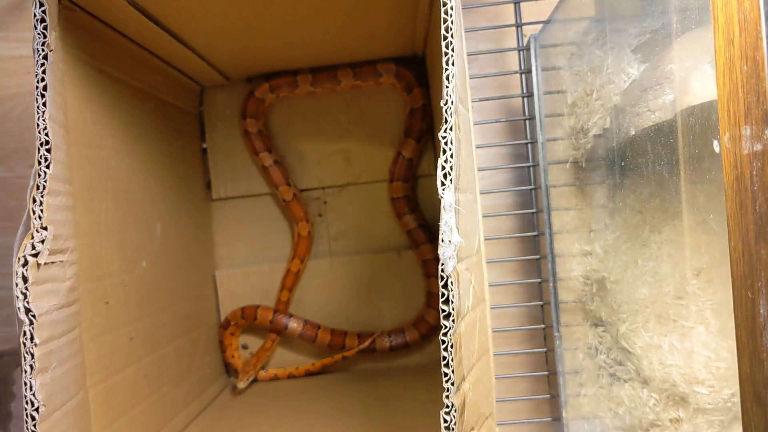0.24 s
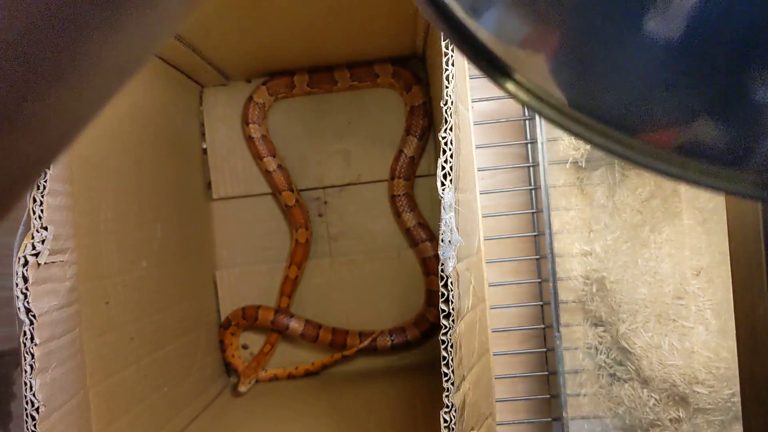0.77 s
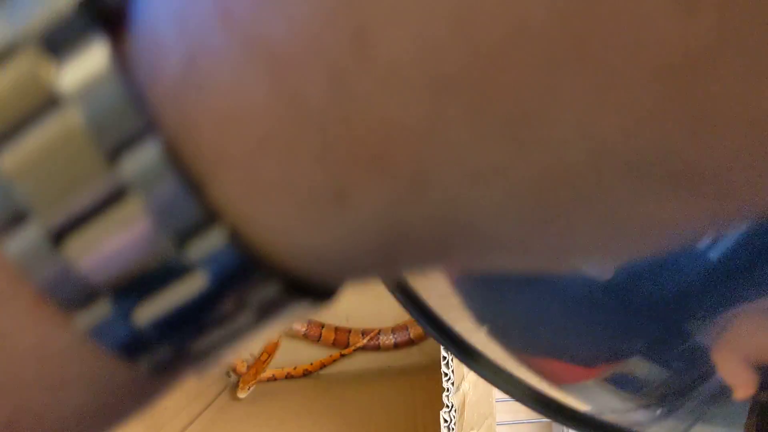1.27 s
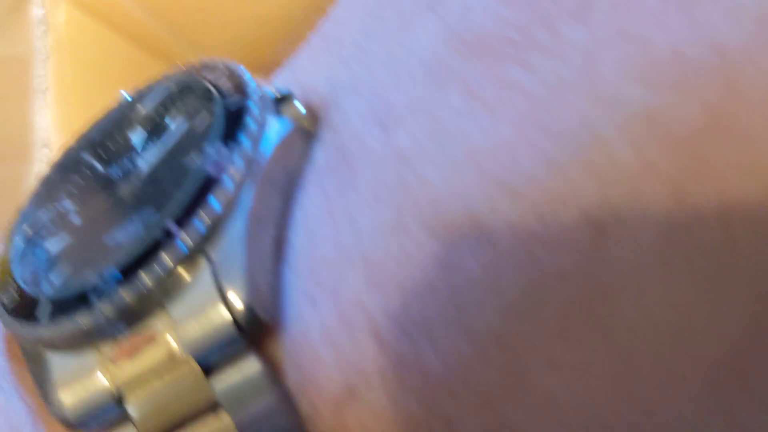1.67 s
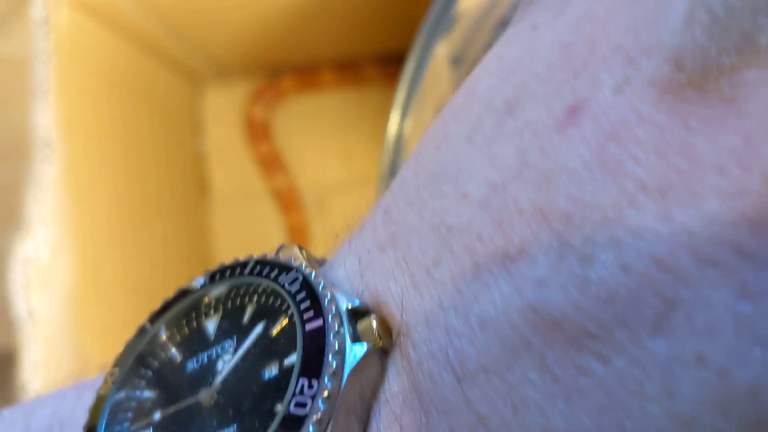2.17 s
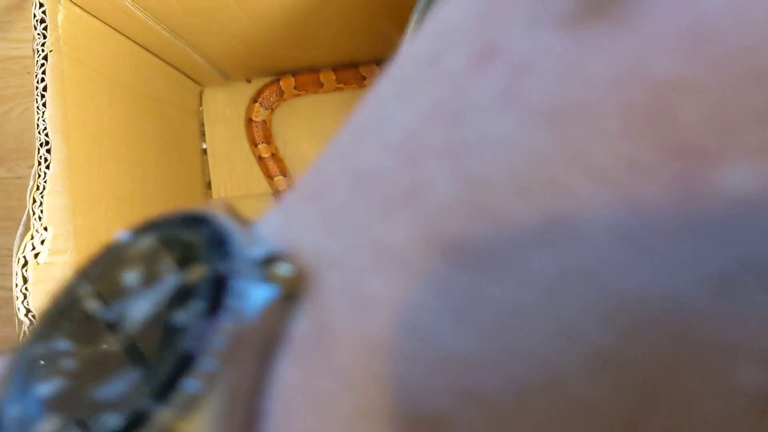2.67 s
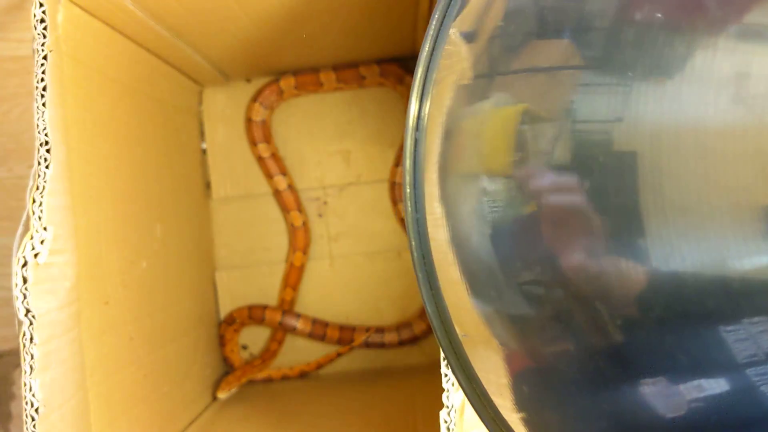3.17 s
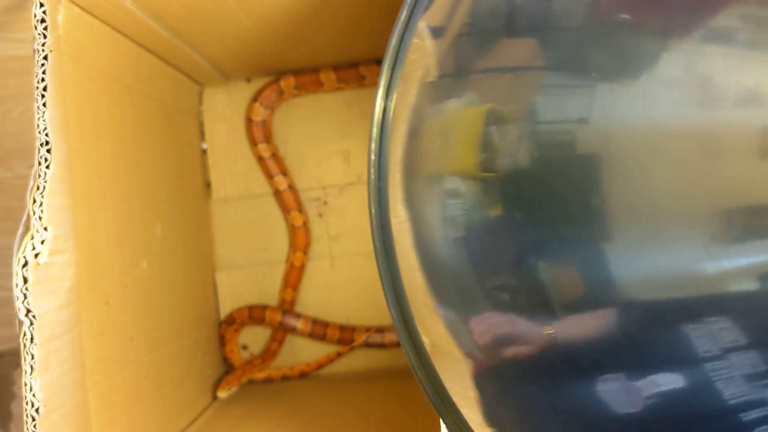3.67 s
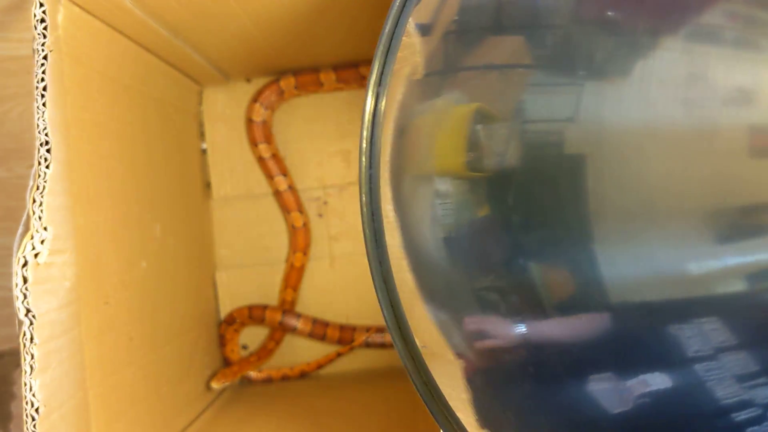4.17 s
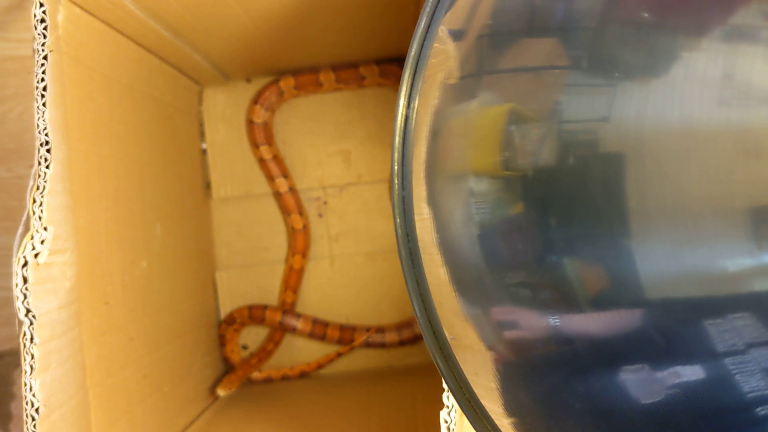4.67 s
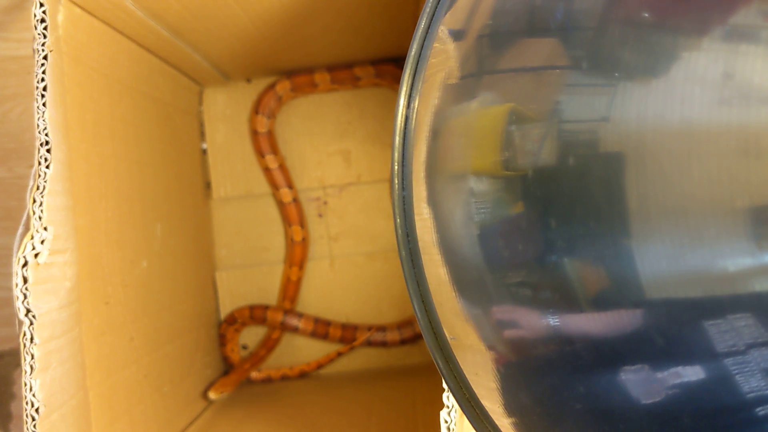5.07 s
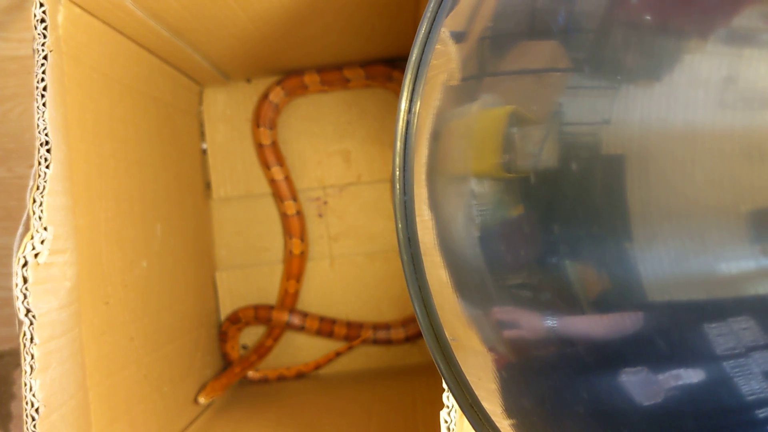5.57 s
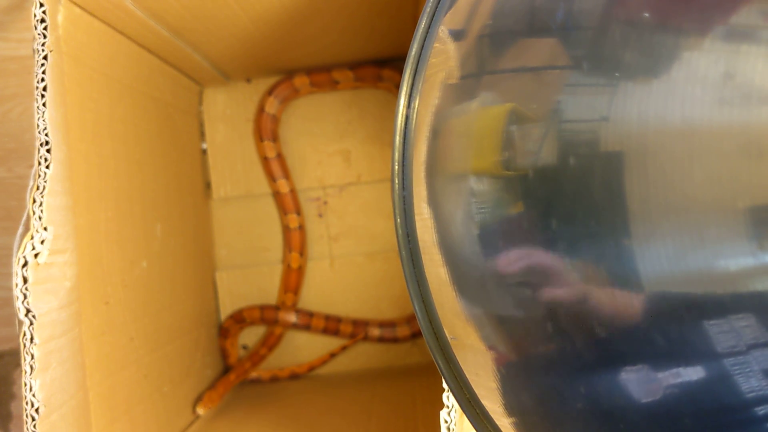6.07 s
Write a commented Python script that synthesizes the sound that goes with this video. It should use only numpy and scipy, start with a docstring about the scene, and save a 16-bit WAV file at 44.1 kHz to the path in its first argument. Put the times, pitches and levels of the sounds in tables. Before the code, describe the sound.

A big thin metal bowl scrapes and knocks in spurts across a cardboard box, with faint high bird twitters in the room.

```python
"""A big thin metal bowl is slid in spurts over a cardboard box in a room. From the start each push
makes it scrape: friction excites the modes of the metal, and the box booms under it. Just after 1 s
the box wall judders by stick and slip; near 1.45 s and 2 s the bowl knocks down hard and rings.
Softer pushes follow, and near 5.8 s it is nudged into place. A small creature, probably a bird,
twitters in four very high phrases: three in the first 3 s and one at the end."""
import sys
import numpy as np
from scipy import signal
from scipy.fft import rfft, irfft, next_fast_len
from scipy.io import wavfile
from scipy.ndimage import uniform_filter1d

SR = 44100
rng = np.random.default_rng(int(sys.argv[2]) if len(sys.argv) > 2 else 0)


def digitize_waveform(pressure):
    """Quantize a signal to 16-bit integers and store it at the path in sys.argv[1].

    Rows of a 2-D input are taken as channels; values are limited to [-1, 1].
    """
    field = np.atleast_2d(pressure).T
    bounded = np.clip(field, -1, 1)
    quanta = np.round(bounded * 32767).astype(np.int16)
    wavfile.write(sys.argv[1], SR, quanta)


N = 279153
TIME = np.arange(N) / SR

# likeness of the two channels, clipped in use: (frequency [Hz], correlation [1])
CORRELATION = [(60, 1.23), (160, 0.85), (550, 0.9463), (1100, -0.1964), (2200, -0.654), (7000, 0)]
# stereo balance: (frequency [Hz], left over right [dB])
BALANCE = [(60, 8), (160, 3), (300, 3.5), (550, 3.5), (1100, 1), (4000, 0), (8000, 6), (15000, -0.5)]
# room tone: (frequency [Hz], relative density [dB])
ROOM_SPECTRUM = [(20, -41.5), (45, -12.5), (80, -2), (190, -7.5), (310, -23.5), (470, -9.5), (950, -22.5),
                 (1450, -19), (2300, -21.5), (4400, -23), (9000, -32.5), (16000, -35)]
# notes of the twitter: (time [s], length [s], level [dB], syllable [name])
NOTES = [(0.06, 0.02155, -40.5, "low"), (.558, 0.036, -42, "middle"), (.574, 0.0656, -45, "top"),
         (0.578, 0.038, -42.5, "flick"), (0.581, 0.0396, -54, "squeak"), (0.59, 0.0267, -39.5, "shrill"),
         (0.591, 0.0185, -38.5, "chip"), (.644, 0.0325, -39.5, "dip"), (0.657, 0.027, -43, "top"),
         (.705, 0.047, -47, "middle"), (0.729, 0.0286, -39.5, "rasp"), (0.753, 0.0445, -41.5, "buzz"),
         (0.76, .03, -43, "lift"), (0.797, 0.0467, -36, "dip"), (.905, 0.0302, -49.5, "low"),
         (0.938, 0.0184, -42, "dip"), (1.469, 0.034, -37.5, "shrill"), (1.496, 0.1032, -42.5, "middle"),
         (1.507, 0.0537, -39.5, "top"), (1.555, 0.0179, -36.5, "dip"), (1.616, 0.027, -42.5, "top"),
         (1.656, 0.0272, -30.5, "lift"), (1.659, 0.0704, -37.5, "fall"), (1.672, 0.144, -44.5, "buzz"),
         (1.8, 0.036, -35.5, "top"), (2.244, 0.0378, -34.5, "top"), (2.252, 0.0278, -33.5, "middle"),
         (2.35, 0.0264, -40, "top"), (2.428, 0.0301, -28.5, "high"), (2.462, 0.05, -49.5, "flick"),
         (2.52, 0.058, -46, "rasp"), (2.586, 0.0334, -36.5, "dip"), (2.688, 0.0526, -46.5, "low"),
         (5.794, 0.0663, -42, "middle"), (5.806, 0.0276, -50, "top"), (5.843, 0.0704, -36.5, "top"),
         (5.924, 0.0294, -32.5, "high"), (5.985, 0.0251, -31.5, "lift"), (5.999, 0.0339, -42.5, "buzz"),
         (6.01, .05, -64.5, "squeak"), (6.015, 0.0514, -44.5, "fall"), (6.064, 0.0315, -38, "dip"),
         (6.13, 0.0156, -45, "flick"), (6.141, 0.0296, -44.5, "low"), (6.151, 0.031, -49, "buzz"),
         (6.162, 0.0217, -36.5, "dip"), (6.171, 0.0246, -43.5, "top")]
# syllables by name: (start pitch [Hz], end pitch [Hz], roughness [1], relative octave level [dB])
SYLLABLES = {"low": (5896.5, 6149, 0.3545, -8.5), "middle": (7850, 7869, 0.32, -5),
             "high": (9460, 9509.5, 0.07, -34), "top": (10380.5, 10489, 0.2121, -35),
             "dip": (9329, 9033.5, 0.5376, -34), "lift": (8450, 8898.5, 0.14, -38.5),
             "flick": (8902, 7599, 1.25, -15.5), "fall": (6849.5, 5898, 0.6166, -6.5),
             "rasp": (6300, 6901, 0.65, -9), "buzz": (7749, 7498, 0.9435, -8),
             "shrill": (7260, 7330, 0.087, 3), "squeak": (2398.5, 2220.5, 0.17, -23.5),
             "chip": (4927, 5104, 0.25, -30)}
# rasp in the twitter: (frequency [Hz], relative density [dB])
RASP_SPECTRUM = [(1500, -36), (2300, -1), (3200, -12), (5000, -9.5), (7800, -0.5), (10500, -7.5),
                 (12500, -7.5), (15500, 0)]
# rumble of the handled box: (time [s], level [dB])
BOX_RUMBLE = [(0.0, -50.5), (0.14, -50.5), (1.04, -50.5), (1.23, -45), (2.64, -51), (3.03, -46),
              (3.35, -58.5), (3.79, -57), (3.98, -60.5), (4.6, -49.5), (5.11, -64.5), (5.69, -67.5),
              (5.89, -52), (6.33, -59.5)]
# soft swells of noise: light rubs, the rim singing as it drags (2.738 s), a faint high hiss (4.9 s):
# (peak time [s], half length [s], centre [Hz], width [Hz], level [dB])
NOISE_SWELLS = [(0.223, 0.35, 3320, 1200, -62.5), (1.108, 0.033, 11000, 5000, -43),
                (1.364, 0.0101, 2400, 3000, -33.5), (2.738, 0.177, 1347, 160, -50.5),
                (3.586, 0.025, 3706, 250, -53.5), (3.791, 0.1576, 324.9, 24.6, -47.5),
                (3.824, 0.061, 540.2, 120, -40.5), (4.292, 0.075, 627, 117.6, -49.5),
                (4.422, 0.2, 1735, 700, -60.5), (4.593, 0.02, 623, 200, -48), (4.9, 0.0855, 4800, 900, -71),
                (5.746, 0.0336, 3170, 499, -52.5), (5.747, 0.0356, 9400, 11060, -51.5)]
# judders of the box wall: (time at full level [s], rise [s], hold [s], level [dB], pitch [Hz],
# release [dB/s])
JUDDERS = [(1.113, 0.0326, .035, -21.5, 155, 236), (1.361, 0.0158, .008, -28, 169.7, 479)]
# the rim catching: (time [s], level [dB])
TICKS = [(.43, -58), (1.076, -38), (1.221, -53.5), (1.343, -23.5), (2.0057, -23.5), (2.449, -47.5),
         (2.839, -52.5), (4.735, -53.5), (5.575, -61)]
# colour of a tick: (frequency [Hz], relative density [dB])
TICK_SPECTRUM = [(1000, -37.5), (3500, -14.5), (7200, 2.5), (11000, -10), (15000, -7.5)]
# modes of the bowl on the box: (frequency [Hz], relative level [dB], t60 [s])
BOWL_MODES = [(153.08, -12.5, 0.43), (188.9, -9.5, 0.19), (525.95, -5.5, 0.2), (537.3, -3, 0.2),
              (577.43, 0, 0.16), (731.7, -9.5, 0.24), (802.5, -11.5, 0.2), (849.8, -10, 0.31),
              (892.5, -24, 0.13), (1020.8, -5.5, 0.1926), (1211, -15.5, .2), (1234.4, -7, 0.26),
              (1291, -8, 0.15), (1387, -6.5, 0.18), (1699.6, -7, 0.07), (1890, -18.5, 0.047),
              (2144, -17, .08), (6070, -25, 0.078), (6650, -11.5, 0.17), (7050, -13.5, 0.062),
              (7360, -12, .05), (7500, -17.5, 0.075), (8730, -16, 0.22)]
# boom, body, clack and treble registers: (low edge [Hz], high edge [Hz])
REGISTERS = [(35, 320), (320, 850), (850, 3500), (3500, 17000)]
# shifting place of the bowl: (time [s], extra left over right [dB])
BOWL_PLACE = [(0, -1), (.9, -0.5), (1.45, 0), (1.9, 2.5), (2.01, -1), (2.5, 0), (3.7, .5), (4.5, -1.5),
              (6.3, -1.5)]
# pushes: (time at full speed [s], rise [s], hold [s], level [dB], brightness [dB])
PUSHES = [(0.005, 0.0103, 0.0054, -32.5, -6), (0.179, 0.16, 0.15, -59, 1.5),
          (0.324, 0.057, 0.0696, -47.5, -5), (0.589, 0.18, 0.346, -57.5, -1),
          (0.969, 0.0127, 0.0355, -46, -3), (1.077, 0.047, 0.0454, -33, -11.5),
          (1.348, 0.0231, 0.0072, -36, -3.5), (1.452, 0.0093, 0.0135, -28, -4.5),
          (1.487, 0.032, 0.422, -41.5, -1.5), (1.893, 0.225, 0.183, -39.5, -8),
          (2.179, 0.148, 0.1873, -42.5, -5), (2.541, 0.154, 0.3, -47.5, -3),
          (3.038, 0.0446, 0.0302, -38.5, -7.5), (3.156, 0.15, 0.103, -53, -9.5),
          (3.56, 0.1996, 0.137, -47.5, -5.5), (3.788, 0.0724, 0.05, -38, -10.5),
          (4.188, 0.258, 0.39, -59.5, -5), (4.275, 0.153, 0.023, -44.5, -13.5),
          (4.343, 0.047, 0.0165, -43.5, -3.5), (4.635, 0.034, 0.0056, -40.5, -9),
          (4.729, .1, 0.05, -55, -24), (4.867, .1, 0.18, -77.5, -4.5), (5.83, 0.026, 0.0228, -38.5, -18),
          (5.933, .1, .04, -52.5, -15.5)]
# sliding metal: (frequency [Hz], relative density [dB])
SLIDING_SPECTRUM = [(35, -33), (70, -9), (180, 3), (360, -8.5), (570, 2), (950, -9.5), (1380, -7.5),
                    (2300, -7), (2900, -17.5), (5200, -20.5), (7200, -25), (9700, -18.5), (11000, -28),
                    (16000, -31)]
# freedom to ring, greatest when the rim rides on the box edge: (time [s], ring over friction [dB])
RING_FREEDOM = [(0, -8.5), (1.4, -17), (1.5, 1), (2.8, -2.5), (2.95, -3), (6.3, -7)]
# the rim singing as it drags on the box edge: (centre [Hz], width [Hz], relative level [dB])
RIM_BANDS = [(1319.5, 280, -8.5), (2238, 180, -22.5), (7396, 1800, -8)]
# noise of a knock: (frequency [Hz], relative density [dB])
KNOCK_SPECTRUM = [(35, -38), (70, -13), (120, 4.5), (190, 4), (340, -5.5), (560, 6), (900, -7),
                  (1370, -1.5), (2200, -13), (4300, -24.5), (7400, -10.5), (9500, -20), (12000, -29),
                  (16000, -33.5)]
# knocks: (time [s], contact time [s], box wall pitch [Hz], pitch favoured by the spot struck [Hz],
# body level over the first 30 ms [dB], boom over body [dB], clack over body [dB])
KNOCKS = [(0.008, 0.00377, 240.8, 517, -43.5, 6.5, 2.5), (0.348, 0.00105, 204.2, 728, -38.5, -18.5, -4.5),
          (0.379, 0.00077, 190.5, 764, -45.5, -2, -4), (0.49, 0.0045, 179.2, 520, -57, 9.5, -11),
          (0.566, 0.0077, 181.1, 492, -54.5, 10.5, -26.5), (0.739, 0.0031, 247.2, 490, -47.5, 2.5, -14.5),
          (0.971, 0.0042, 201.7, 716, -44.5, -2.5, -6), (1.058, 0.0081, 231.7, 602, -36.5, 0.5, -19.5),
          (1.323, 0.00087, 172, 1700, -57, 7, 11), (1.344, 0.00098, 166.2, 730, -43, 11.5, 2),
          (1.449, 0.00039, 178, 548, -16, -15, -7), (1.92, 0.00175, 126.5, 525, -36, -1, -11.5),
          (1.997, 0.0053, 165.1, 764, -25, -11.5, -2.5), (2.0057, 0.000142, 240.3, 1010, -23, -16, 1.5),
          (2.8355, 0.00146, 228.9, 1340, -32.5, -3.5, -2.5), (3.008, 0.0049, 245.5, 503, -37.5, -5, -11.5),
          (3.245, 0.0056, 147.9, 523, -61, 9, -16.5), (3.743, 0.00257, 190.8, 563, -46.5, -6, -9.5),
          (4.634, 0.0102, 213.2, 530, -46.5, 3.5, -5.5), (5.055, 0.0045, 149, 524, -70.5, 7, -3),
          (5.325, 0.00176, 246.3, 1310, -62, 11, -0.5), (5.505, 0.0036, 244, 557, -67.5, 3.5, -3.5),
          (5.676, 0.00141, 245.7, 1380, -53.5, 11, 3), (5.684, .0008, 236.2, 547, -53, 8.5, -9.5),
          (5.817, 0.00148, 220.6, 782, -40, 0, -7.5), (5.835, 0.00145, 214.6, 504, -47, -1, 1)]

SIDES = np.array([[.5], [-.5]])   # splits a level difference between left and right


def from_db(db):
    """Amplitude ratio of a level in decibels."""
    return 10 ** (np.asarray(db) / 20)


def rms_one(x):
    """Normalisation to unit power."""
    return x / np.sqrt(np.mean(x ** 2) + 1e-20)


def in_time(points):
    """Linear interpolation of a curve at every sample."""
    return np.interp(TIME, *np.transpose(points))


def at_hz(points, hz):
    """Interpolation of a spectrum on a log-frequency axis."""
    f, value = np.transpose(points)
    return np.interp(np.log(hz + 1), np.log(f), value)


def band(x, low, high, order=3):
    """Causal Butterworth band-pass."""
    sos = signal.butter(order, [low, min(high, .47 * SR)], "band", fs=SR, output="sos")
    return signal.sosfilt(sos, x + 1e-18)


def wander(per_s, size):
    """Continuous random modulation of unit variance."""
    steps = np.arange(size) * per_s / SR
    return np.interp(steps, np.arange(size), rng.standard_normal(size)) * np.sqrt(3 / 2)


def swell_db(s, rise_s, hold_s, release_db_per_s, rise_db=17):
    """Exponential growth, hold and exponential decay, in dB relative to the top."""
    rise = np.minimum(rise_db * (TIME - s) / rise_s, 0)
    release = release_db_per_s * np.maximum(TIME - s - hold_s, 0)
    return np.maximum(rise - release, -150)


def stereo_noise(size, spectrum, grain=1):
    """Partial coherence: coloured noise, alike at both sides in the bass and unrelated in the treble."""
    hz = np.fft.rfftfreq(size, 1 / SR)
    mid, side = rfft(rng.standard_normal((2, size)) * grain)
    alike = np.clip(at_hz(CORRELATION, hz), 0, .99)
    pair = np.sqrt(1 + alike) * mid + 2 * SIDES * np.sqrt(1 - alike) * side
    colour = from_db(at_hz(spectrum, hz) + SIDES * at_hz(BALANCE, hz))
    return rms_one(irfft(pair * colour, size))


def steady_noise(spectrum):
    """Stationary stereo noise as long as the scene."""
    return stereo_noise(next_fast_len(N), spectrum)[:, :N]


def room_tone(level_db=-61):
    """Ambient noise floor, strongest in the bass."""
    return from_db(level_db) * steady_noise(ROOM_SPECTRUM)


def across_room(x, direct_db=-6, wet_db=-2.5, direct_lean_db=10, wet_lean_db=6, t60=0.21):
    """Direct and reverberant fields: one path from the left, then dense decaying reflections."""
    t = np.arange(SR // 2) / SR
    echoes = rng.standard_normal((2, len(t))) * from_db(-60 * t / t60)
    echoes /= np.sqrt(np.sum(echoes ** 2) / 2)
    wet = signal.fftconvolve(x[None], echoes, axes=1)[:, :N]
    return from_db(direct_db + SIDES * direct_lean_db) * x + from_db(wet_db + SIDES * wet_lean_db) * wet


def twitter(stumble_hz=350, rough_hz=520, flicker_db=3, edge_s=0.0072, difference_db=-8.5, rasp_db=-7):
    """Random modulation roughens short whistles; two at once mix into a lower difference tone."""
    voice, octave, power, rasp_power = np.zeros((4, N))
    for s, length, level_db, syllable in NOTES:
        start_hz, end_hz, rough, octave_db = SYLLABLES[syllable]
        size, at = int(length * SR), int(s * SR)
        t, span = np.arange(size) / SR, slice(at, at + size)
        jitter = min(rough, 1) * rough_hz * 2 * np.tanh(wander(2000, size) / 2)
        stumble = rough * stumble_hz * wander(140, size)
        hz = np.linspace(start_hz, end_hz, size) + jitter + stumble
        phase = 2 * np.pi * np.cumsum(hz) / SR
        swell = np.sin(np.pi / 2 * np.clip(np.minimum(t, length - t) / edge_s, 0, 1)) ** 2
        swell *= from_db(level_db + flicker_db * rough * wander(500, size))
        voice[span] += swell * np.sin(phase)
        octave[span] += swell * from_db(octave_db) * np.sin(2 * phase)
        power[span] += swell ** 2
        rasp_power[span] += (swell * rough) ** 2
    difference = from_db(difference_db) * band(voice ** 2 / np.sqrt(power + 1e-12), 2000, 3700)
    rasp = from_db(rasp_db) * np.sqrt(rasp_power) * steady_noise(RASP_SPECTRUM)[0]
    return np.sqrt(2) * (voice + octave + difference) + rasp


def noise_swells():
    """Band-limited noise under Gaussian envelopes: light rubs, the singing rim and a faint high hiss."""
    out, white = 0, steady_noise([(20, 0), (20000, 0)])
    for s, half_s, hz, width_hz, level_db in NOISE_SWELLS:
        noise = rms_one(band(white, max(hz - width_hz / 2, 20), hz + width_hz / 2, order=2))
        out += noise * from_db(level_db) * np.exp(-((TIME - s) / half_s) ** 2)
    return out


def box_judder(overtone_db=-22, lean_db=5.0, waver=0.02):
    """Stick-slip oscillation locks on to the lowest mode of the box wall."""
    out = 0
    for s, rise_s, hold_s, level_db, hz, release_db_per_s in JUDDERS:
        phase = 2 * np.pi * np.cumsum(hz * (1 + waver * wander(66, N))) / SR
        overtones = (np.sin(3 * phase) + np.sin(4 * phase)) * wander(80, N) / 2
        wave = np.sin(phase) + from_db(overtone_db) * overtones
        out += wave * from_db(level_db + swell_db(s, rise_s, hold_s, release_db_per_s))
    return np.sqrt(2) * out * from_db(SIDES * lean_db)


def rim_ticks(t60=0.0512):
    """Contact transients: the rim catches in bright bursts that decay at once."""
    envelope = 0
    for s, level_db in TICKS:
        envelope += (TIME >= s) * from_db(level_db - 60 * np.clip((TIME - s) / t60, 0, 2))
    return envelope * steady_noise(TICK_SPECTRUM)


def bowl_ring(t, scatter_db=0, spot_hz=1000, spot_db=0):
    """Modal superposition: damped sinusoids, boosted near the pitch that the spot struck favours."""
    hz, level_db, t60 = np.transpose(BOWL_MODES)[:, :, None]
    favour_db = spot_db / (1 + (6 * np.log2(hz / spot_hz)) ** 2)
    strength = from_db(level_db + favour_db + scatter_db * rng.standard_normal(hz.shape) - 60 * t / t60)
    # short waves reach the two sides out of step
    skew = np.arccos(np.clip(at_hz(CORRELATION, hz), 0, 1)) * rng.choice([-1, 1], hz.shape)
    phase, lean_db = 2 * np.pi * hz * t, at_hz(BALANCE, hz)
    return np.array([(strength * from_db(side * lean_db) * np.sin(phase + side * skew)).sum(0)
                     for side in SIDES])


def overlapping_modes(x, size=1536):
    """Modal overlap in bowl and box leaves fixed narrow peaks and dips on any rubbing."""
    response = rfft(rng.standard_normal(size) * from_db(-60 * np.arange(size) / size))
    response /= np.sqrt(uniform_filter1d(np.abs(response) ** 2, size=12))   # only fine ripple stays
    return signal.fftconvolve(x, irfft(response, size)[None], axes=1)[:, :N]


def push_levels(release_db_per_s=139.5, treble_release_db_per_s=213, push_boom_db=-7.5,
                rumble_lift_db=0.5, sway_db=1.18):
    """Power addition of pushes and box rumble: sliding level, and boom and treble over it, in dB."""
    body, treble = np.zeros((2, N))
    for s, rise_s, hold_s, level_db, bright_db in PUSHES:
        body_db = level_db + swell_db(s, rise_s, hold_s, release_db_per_s)
        treble_db = level_db + bright_db + swell_db(s, rise_s, hold_s, treble_release_db_per_s)
        body = np.hypot(body, from_db(body_db))
        treble = np.hypot(treble, from_db(treble_db))
    rumble = from_db(in_time(BOX_RUMBLE) + rumble_lift_db + sway_db * wander(25, N))
    boom = np.hypot(rumble, body * from_db(push_boom_db))
    return 20 * np.log10([body, boom / body, treble / body])


def bowl_scrape(catch_db=1.4636, grit_db=1.5, bite_db=1.96):
    """Frictional excitation: dense slips of the rim on cardboard fibres hiss and keep the bowl ringing."""
    level_db, boom_db, bright_db = push_levels()
    freedom = from_db(in_time(RING_FREEDOM))
    size = next_fast_len(N)
    slips = from_db(catch_db * wander(260, size) + grit_db * wander(3000, size))
    friction = stereo_noise(size, SLIDING_SPECTRUM, slips)[:, :N]
    coloured = rms_one(overlapping_modes(friction))
    force = slips * rng.standard_normal(size)
    ring = signal.fftconvolve(force[None], bowl_ring(np.arange(SR // 3) / SR), axes=1)[:, :N]
    ring = freedom * rms_one(ring)
    # faster sliding lifts the treble, where the modes crowd together
    gains_db = [boom_db - 1, -2.5, bright_db - 1, bright_db - 4.5]
    out = 0
    for rub, edges, gain_db in zip([friction, friction, coloured, coloured], REGISTERS, gains_db):
        blend = (rub + ring) / np.sqrt(1 + freedom ** 2)
        out += rms_one(band(blend, *edges)) * from_db(gain_db)
    for hz, width_hz, sing_db in RIM_BANDS:
        singing = rms_one(band(coloured, hz - width_hz / 2, hz + width_hz / 2, order=2))
        out += singing * freedom * from_db(sing_db + bright_db / 2)
    return out * from_db(level_db + bite_db * wander(35, N))   # the rim bites and lets go


def bowl_knocks(ring_db=-5, wall_db=1, tail_db=-3, wall_t60=0.244, crack_t60=0.012):
    """Impact excitation: a brief crack, free decay of bowl modes and box wall, and a diffuse tail."""
    size, head = SR // 2, SR * 3 // 100
    t, out = np.arange(size) / SR, np.zeros((2, N + size))
    tail_t60s, cracks_db = np.geomspace(0.321, 0.2424, len(REGISTERS)), [5, 8, 16, 20]   # per register
    for s, contact_s, wall_hz, spot_hz, body_db, boom_db, clack_db in KNOCKS:
        treble_db = clack_db + 3.5 + .5 * body_db   # softer knocks are duller
        levels_db = body_db + np.array([boom_db, 0, clack_db, treble_db])
        wall = np.sin(2 * np.pi * wall_hz * t) * from_db(wall_db - 60 * t / wall_t60 + 2 * SIDES)
        ring = bowl_ring(t, scatter_db=0.5, spot_hz=spot_hz, spot_db=8) * from_db(ring_db) + wall
        noise, at = stereo_noise(size, KNOCK_SPECTRUM), round(s * SR)
        onset = np.minimum(t / contact_s, 1) ** 2   # a padded contact swallows the crack
        for edges, level_db, t60, crack_db in zip(REGISTERS, levels_db, tail_t60s, cracks_db):
            fade = from_db(crack_db - 60 * t / crack_t60) + from_db(tail_db - 60 * t / t60)
            part = band((ring + noise * fade) * onset, *edges, order=4)
            out[:, at:at + size] += part * from_db(level_db) / np.sqrt(np.mean(part[:, :head] ** 2))
    return out[:, :N]


def scene(right_delay_s=8e-5):
    """Superposition of the sources; level and time differences put the box a little to the left."""
    air = room_tone()
    bowl = bowl_knocks() + bowl_scrape() + box_judder() + noise_swells() + rim_ticks()
    left, right = bowl * from_db(SIDES * in_time(BOWL_PLACE))
    right = np.interp(TIME - right_delay_s, TIME, right)
    return air + across_room(twitter()) + np.array([left, right])


def record(dry, bass_hz=50, cutoff_hz=15950):
    """Band limiting and saturation: the microphone thins deep bass, rounds peaks and cuts the top."""
    thin = signal.sosfilt(signal.butter(2, bass_hz, "high", fs=SR, output="sos"), dry)
    low_pass = signal.ellip(10, .1, 80, cutoff_hz, fs=SR, output="sos")
    return signal.sosfilt(low_pass, np.tanh(thin))


dry = scene()
out = record(dry)
digitize_waveform(out)
```